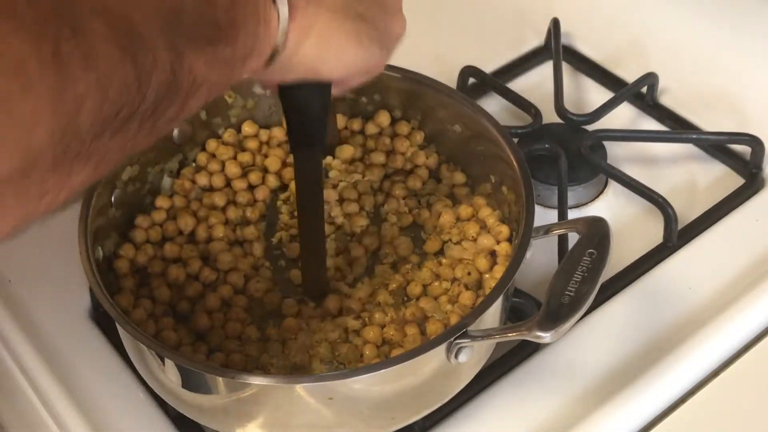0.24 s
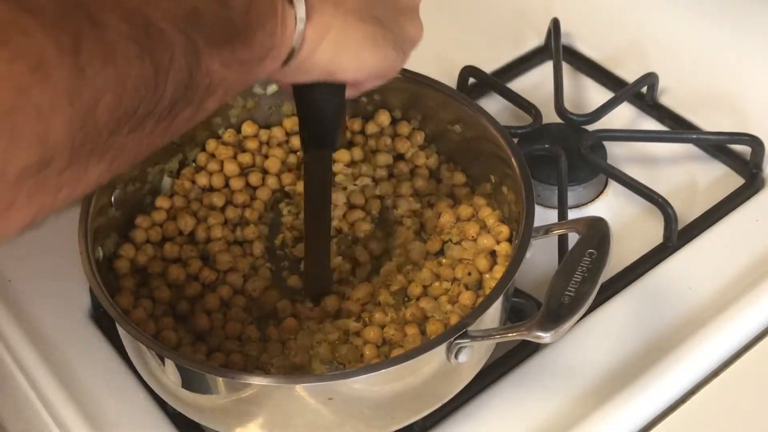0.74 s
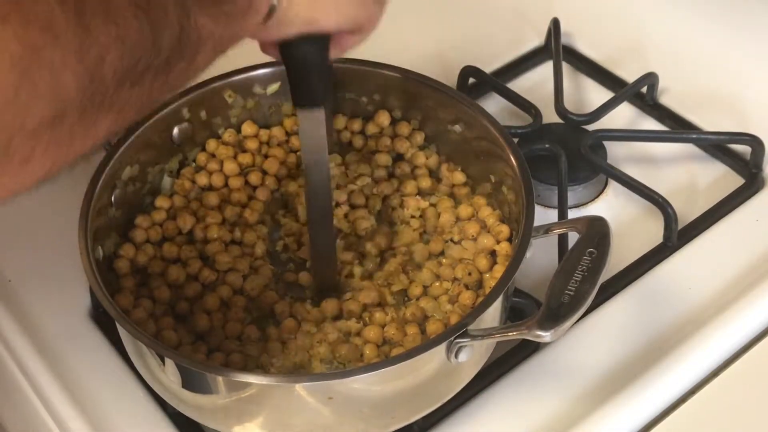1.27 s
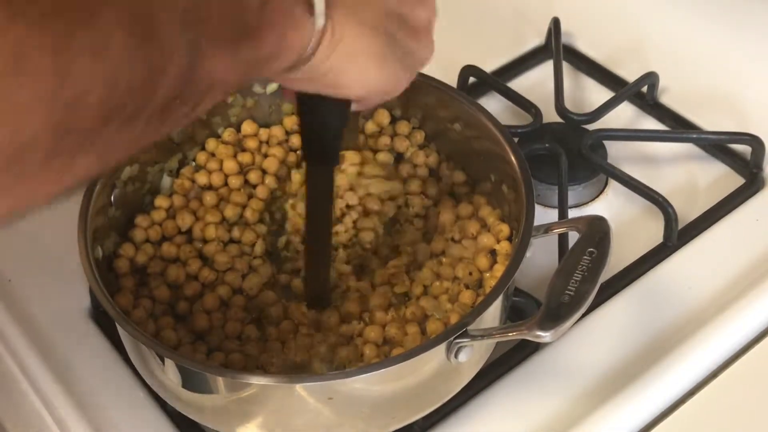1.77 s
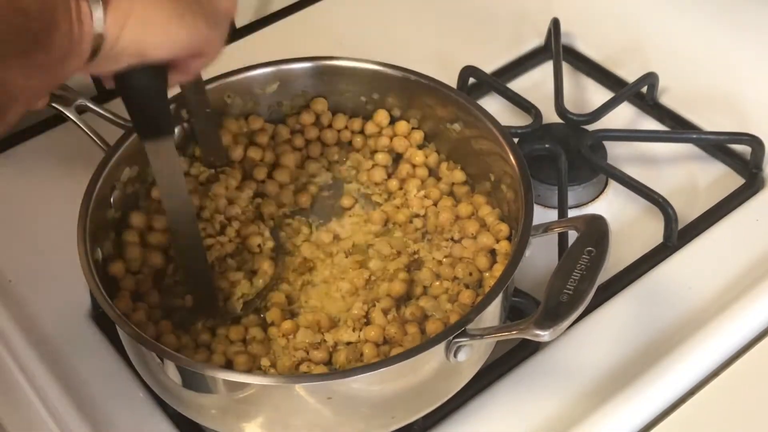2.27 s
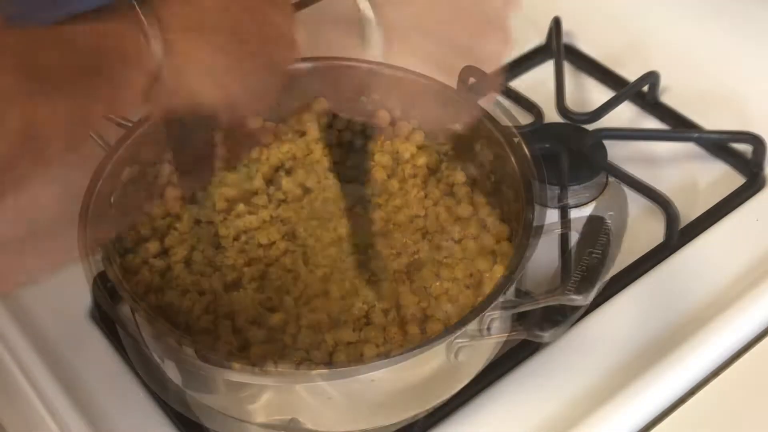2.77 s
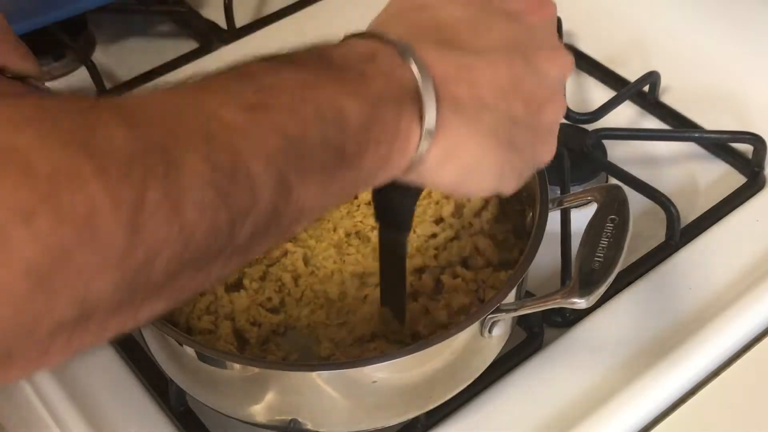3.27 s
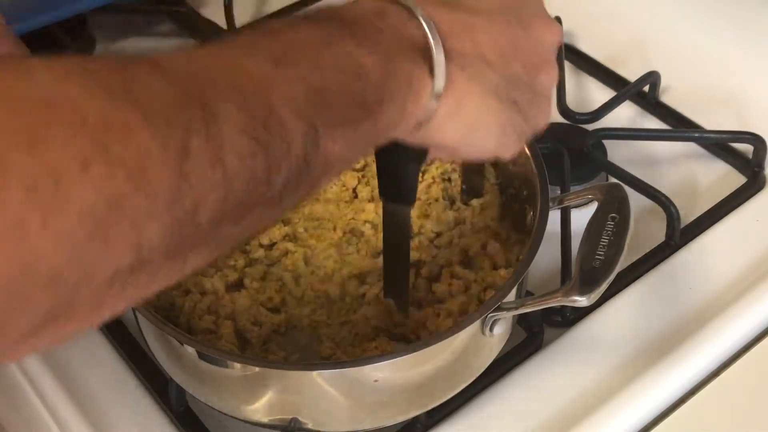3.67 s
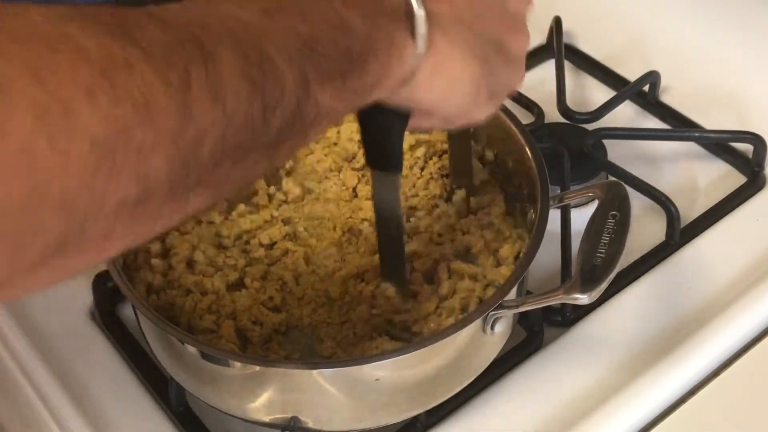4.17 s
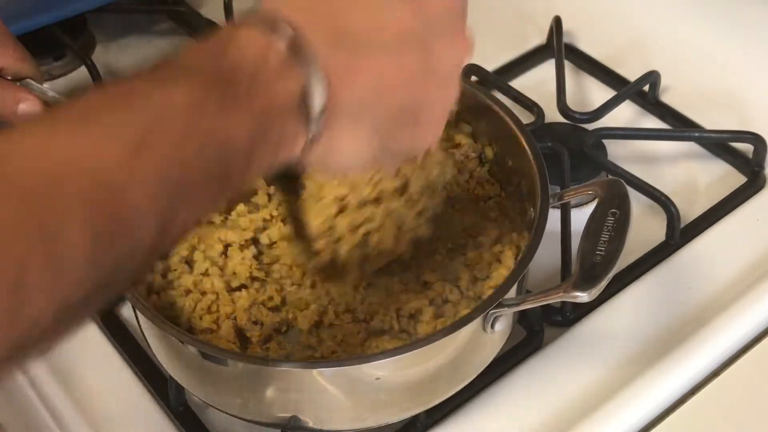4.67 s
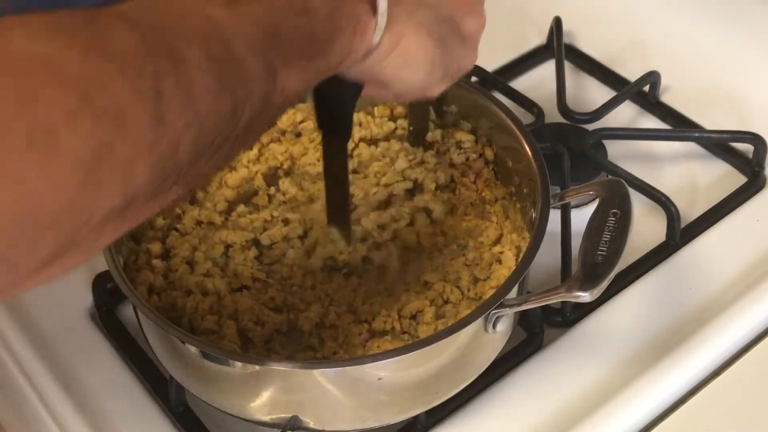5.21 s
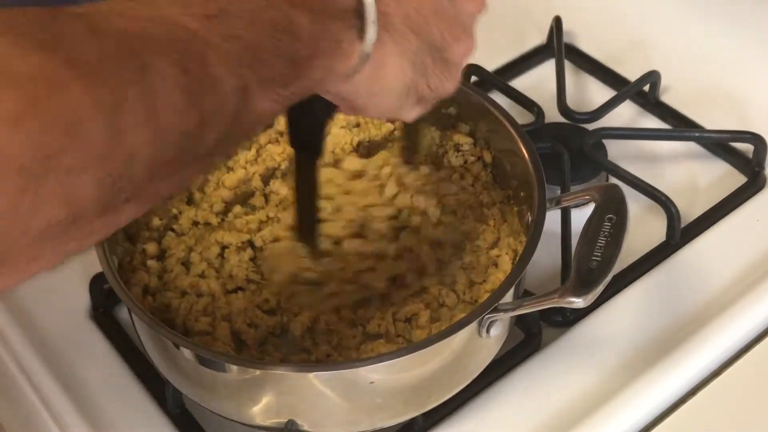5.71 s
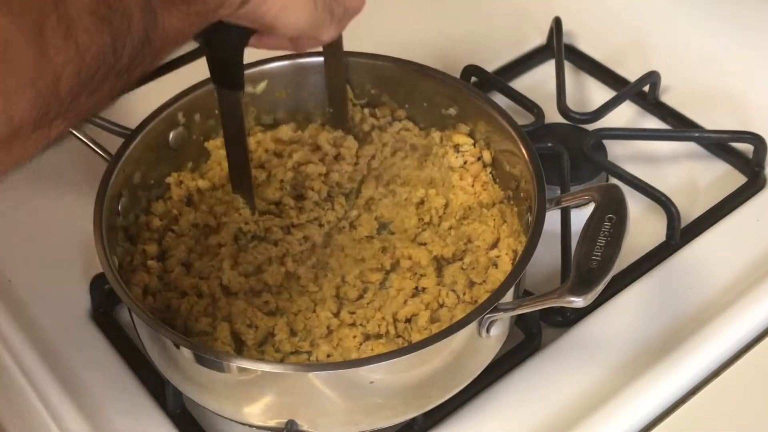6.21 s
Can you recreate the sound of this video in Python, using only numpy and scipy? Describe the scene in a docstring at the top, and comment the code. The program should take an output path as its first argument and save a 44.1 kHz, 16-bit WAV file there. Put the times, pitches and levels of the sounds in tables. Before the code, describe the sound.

A steel masher crushes cooked chickpeas in a metal pot on a stove, knocking the bottom with dull clanks between wet, crackling squelches.

```python
"""A steel masher crushes cooked chickpeas in a steel pot on a stove, in a small kitchen.
Strokes knock the pot's bottom: shaped noise bursts plus decaying modes, dulled by the food, with a room tail
and a dense rattle. Between knocks wet mash squelches (swelling noise, tiny pitched pops) and snaps brightly,
and the masher clicks and squeaks. A few pushes clunk the grate.
Beneath lie air noise, a hum, and a low rumble that rises near 2.8 s."""
import sys
import numpy as np
from scipy import signal
from scipy.fft import rfft, irfft, next_fast_len
from scipy.io import wavfile
from scipy.ndimage import uniform_filter1d, map_coordinates

SR = 44100
rng = np.random.default_rng(int(sys.argv[2]) if len(sys.argv) > 2 else 0)


def bounce(signal):
    """Save signal as a 16-bit WAV file at the path given by the first command-line argument."""
    frames = np.transpose(np.atleast_2d(signal))
    limited = np.clip(frames, -1, 1)
    pcm = np.round(limited * 32767).astype(np.int16)
    wavfile.write(sys.argv[1], SR, pcm)


N = 284424
TIME = np.arange(N) / SR
SIZE = 32768  # samples in one struck sound
HZ = np.fft.rfftfreq(SIZE, 1 / SR)
STRUCK_TIME = np.arange(SIZE) / SR


def amp(db):
    """Decibels to gain."""
    return 10 ** (np.asarray(db) / 20)


def unit(x):
    """Scale to rms 1."""
    return x / np.sqrt(np.mean(x ** 2) + 1e-20)


def along(points, hz):
    """Read a curve of (f/Hz, value) points on a log frequency axis."""
    f, value = np.transpose(points)
    return np.interp(np.log(hz + 1), np.log(f + 1), value)


def wobble(rate):
    """A smooth random curve, rate knots a second."""
    knots = rng.standard_normal(int(N * rate / SR) + 4)
    return map_coordinates(knots, [TIME * rate])


def filtered(x, response):
    """Apply a gain that depends on frequency."""
    m = next_fast_len(N + SR // 2)
    gain = response(np.fft.rfftfreq(m, 1 / SR))
    return irfft(rfft(x, m) * gain, m)[:N]


def coloured(x, spectrum):
    """Filter x by a (f/Hz, gain/dB) curve, then scale to rms 1."""
    return unit(filtered(x, lambda hz: amp(along(spectrum, hz))))


def add(track, s, sound):
    """Mix a sound into the track at time s."""
    part = track[max(round(s * SR), 0):][:len(sound)]
    part += sound[:len(part)]


def fading_ring(start_db=-49, t60=0.99):
    """The pot's bottom is still sounding as the scene opens: coloured noise that decays."""
    spectrum = [(300, -31), (500, -9.5), (610, -7), (740, -8), (830, -31), (950, -13),
                (1200, -21.5), (4000, -33.0)]
    ring = coloured(rng.standard_normal(N), spectrum)
    return amp(start_db - 60 * TIME / t60) * ring


# tone of the kitchen's air noise: f/Hz, relative level/dB
AIR_TONE = [(25, -38), (31, -17), (39, -2.5), (54, 11.5), (75, -1.5), (130, 5.5), (175, -2), (300, -12.5),
            (690, -9.5), (1100, -11), (1500, -12.5), (2400, -23.5), (6000, -33), (10500, -50), (12900, -31),
            (15500, -42)]
# low rumble over time, before its gain: t/s, level/dB
RUMBLE_LEVEL = [(0, -69), (2.72, -70), (2.93, -52.5), (6.45, -51)]
# appliance tones, about which each level wanders: f/Hz, level/dB (rms)
HUM_TONES = [(59.8, -61), (108, -76), (120, -65.5), (172, -87), (248, -70), (587, -74), (958, -87)]


def background(air_db=-56, rumble_gain_db=-3):
    """Steady air noise, a low rumble and the slightly unsteady hum of appliances."""
    air = amp(air_db) * coloured(rng.standard_normal(N), AIR_TONE)
    rumble_tone = [(25, -36), (55, -1.5), (150, -9), (270, -7.0), (500, -17.5), (1500, -44)]
    rumble = coloured(rng.standard_normal(N), rumble_tone)
    rumble_db = np.interp(TIME, *np.transpose(RUMBLE_LEVEL)) + rumble_gain_db
    hum = np.zeros(N)
    for hz, db in HUM_TONES:
        level = amp(db + wobble(3.24)) * np.sqrt(2)  # rms to peak
        hum += level * np.sin(2 * np.pi * hz * TIME + 0.31 * wobble(2.76))
    return air + amp(rumble_db) * rumble + hum


# how fast the kitchen's answer dies: f/Hz, t60/s
KITCHEN_DECAY = [(100, 0.52), (260, 0.4), (700, 0.4), (1800, 0.33), (5000, 0.29), (13000, 0.2)]


def room_tail(noise, build_s=0.0042):
    """The kitchen's answer, of energy 1: it builds up, then each frequency dies at its own speed."""
    hz, t, z = signal.stft(noise, SR, nperseg=256)
    decay = amp(-60 * t / along(KITCHEN_DECAY, hz)[:, None])
    tail = signal.istft(z * decay, SR, nperseg=256)[1][:SIZE]
    tail = tail * (1 - np.exp(-STRUCK_TIME / build_s))
    return tail / np.linalg.norm(tail)


def swells(rows, attack_s, release_s):
    """Envelope of (t/s, length/s, level/dB) events: attack before t, hold, release; powers add."""
    power = np.zeros(N)
    for s, length, db in rows:
        before = np.maximum(s - TIME, 0) / attack_s
        after = np.maximum(TIME - s - length, 0) / release_s
        power += amp(db) ** 2 * np.exp(-2 * np.minimum(before + after, 20))
    return np.sqrt(power)


def pops(rate, spread_db):
    """Tiny bursts at random times; a wider spread makes a few much larger than the rest."""
    size = amp(spread_db * np.minimum(rng.standard_exponential(N), 4))
    return (rng.random(N) < rate / SR) * size * rng.choice([-1, 1], N)


def grains(rate, length, pitch_hz, spread_db=4.5, cycles=6, octaves=.6, size=200):
    """Tiny air pockets pop, each a few cycles at its own pitch, a few much larger than the rest."""
    n, t = max(int(length * SR), 1), np.arange(size) / SR
    chance = rng.random((int(abs(rate) * length) + 3, 4))
    start = (chance[:, :1] * n).astype(int)
    detune = 2 * octaves * (chance[:, 1:2] - chance[:, 2:3])  # octaves
    hz = np.minimum(pitch_hz * 2 ** detune, SR / 2)
    strength = amp(-spread_db * np.log(.01 + chance[:, 3:]))
    waves = strength * np.sin(2 * np.pi * hz * t) * amp(-60 * hz * t / cycles)
    places = start + np.arange(size)
    return unit(np.bincount(places.ravel(), waves.ravel(), n + size))


# tone of the smearing paste and of the rattle after knocks: f/Hz, relative level/dB
SMEAR_TONE = [(300, -34), (700, 12.5), (1300, 4), (2500, -4.5), (5000, -7), (8000, -17.5), (16000, -21)]
# tone of bursting air pockets: f/Hz, relative level/dB
CRACKLE_TONE = [(1000, -22), (3500, -9), (6000, 2.5), (9000, 2.5), (13000, 3.5), (16000, -2)]
# each push or pull of the plate, before layer gains:
# t/s, length/s, wet crackle level/dB, paste smear level/dB (relative to the crackle)
SQUELCH_EVENTS = [(0.039, 0.089, -55.5, -20), (0.249, .19, -58.5, -3), (0.5, 0.19, -61, -7),
                  (0.801, 0.1, -56.5, -7), (1.015, 0.092, -58.5, -8), (1.198, 0.09, -56.5, -7.5),
                  (1.41, 0.048, -54, -3), (1.537, 0.07, -55, -10), (2.132, 0.046, -62, -10),
                  (2.22, 0.31, -60.5, -6), (2.591, 0.05, -52, -5.5), (2.694, 0.42, -65, 1),
                  (3.172, .13, -60, -6.5), (3.387, .12, -59.5, -8), (3.563, 0.065, -59.5, -8.5),
                  (3.736, 0.063, -58, -7), (3.887, 0.23, -63.5, -1), (4.148, 0.18, -70, 1),
                  (4.634, 0.072, -77, -14), (4.9, .22, -65.5, 0.5), (5.186, 0.23, -62, -0.5),
                  (5.496, .22, -63.5, -5), (6.024, 0.5, -61.5, -1)]
# steel rubs the wall: t/s, length/s, level/dB
SQUEAK_EVENTS = [(2.26, 0.013, -43.5), (2.299, 0.011, -54), (5.28, .022, -56)]
SWELL_S, RELEASE_S = 0.012, 0.023  # squelch build-up and dying away (time constants)
REST_DB = -76  # the mash settles between strokes; before the crackle gain
RATTLE_DB, RATTLE_T60_S = -16.5, 0.42  # rattle: level against the knock's table level, decay
SQUEAK_EDGE_S = 0.0044  # how fast a squeak starts and stops (time constant)


def mash_and_rattle(smear_gain_db=-1, crackle_gain_db=-6.0, clump_db=3.5, tick_db=1, pop_hz=7800,
                    tear_db=-2, tear_hz=3600, room_db=-7):
    """Paste smears and air pockets burst in clumps; a dense, irregular rattle trails knocks; steel squeaks."""
    wet_rows = [(s, length, db) for s, length, db, _ in SQUELCH_EVENTS]
    pressed_rows = [(s, length, db + smear_db) for s, length, db, smear_db in SQUELCH_EVENTS]
    rattle_rows = [(s + SWELL_S * 2, 0, db + RATTLE_DB) for s, db, *_ in KNOCK_EVENTS]
    wet = swells(wet_rows, SWELL_S, RELEASE_S) + amp(REST_DB)
    pressed = swells(pressed_rows, SWELL_S, RELEASE_S)
    rattle = swells(rattle_rows, SWELL_S / 2, RATTLE_T60_S / np.log(1000))

    # smear and rattle share one irregular stream of bursts
    stream_level = np.hypot(amp(smear_gain_db) * pressed, rattle) * amp(0.87 * wobble(36))
    smear_and_rattle = stream_level * coloured(pops(rate=4400, spread_db=0), SMEAR_TONE)
    tearing = amp(tear_db) * pressed * grains(1100, N / SR, tear_hz)[:N]
    fizz = amp(clump_db * wobble(70)) * coloured(pops(rate=2800, spread_db=2.0), CRACKLE_TONE)
    ticks = amp(tick_db) * grains(380, N / SR, pop_hz, spread_db=5, cycles=8)[:N]
    crackle = amp(crackle_gain_db) * wet * (fizz + ticks)
    rub_tone = [(1200, -25), (1900, -9), (3500, 0), (4400, -7), (6000, -21)]
    rub = coloured(pops(rate=4500, spread_db=1), rub_tone)
    squeak = swells(SQUEAK_EVENTS, SQUEAK_EDGE_S, SQUEAK_EDGE_S) * rub

    dry = smear_and_rattle + tearing + crackle + squeak
    room = signal.fftconvolve(dry, room_tail(rng.standard_normal(SIZE)))[:N]
    return dry + amp(room_db) * room


def shaped(burst, gain, size=400):
    """Give a noisy burst a broad spectrum, causally: peaks ring on after the attack."""
    z = rfft(burst, SIZE)
    broad = np.sqrt(np.abs(uniform_filter1d(np.abs(z) ** 2, size)))
    # folding the cepstrum makes the filter minimum-phase
    cepstrum = irfft(np.log(np.maximum(gain / broad, 1e-6)))
    cepstrum[1:SIZE // 2] *= 2
    cepstrum[SIZE // 2 + 1:] = 0
    return irfft(z * np.exp(rfft(cepstrum)))


def strike(noise, t60, rise_s, room_db):
    """Dense, quickly damped vibration of a struck body, followed by the room."""
    direct = noise[0] * amp(-60 * STRUCK_TIME / t60) * (1 - np.exp(-STRUCK_TIME / rise_s))
    return direct / np.linalg.norm(direct) + amp(room_db) * room_tail(noise[1])


def damped(hz, t60, rise_s=0.0023):
    """One ringing mode, at a random phase."""
    wave = np.sin(2 * np.pi * (hz * STRUCK_TIME + rng.random()))
    return wave * amp(-60 * STRUCK_TIME / t60) * (1 - np.exp(-STRUCK_TIME / rise_s))


# a blow on bare steel: f/Hz, relative level/dB
BARE_BLOW_TONE = [(30, -30), (110, 0), (185, -0.5), (270, -7), (370, -2), (600, -3), (830, -4), (950, 3.5),
                  (1300, -1.15), (2100, -5), (3900, -8), (4600, -9.5), (5450, -11), (6100, -11),
                  (8500, -15), (9600, -21), (12500, -21), (15500, -28)]
# where the bottom booms and zings: f/Hz, share of the blow's boom (0-1)
BOOM_SHARES = [(370, 0.09), (600, 1), (830, 0.7), (950, 0), (4600, 0.25), (5450, 0.84), (6100, 0.03)]
# the thud below this pitch grows less than the blow (dB per dB)
THUD_HZ, THUD_FOLLOWS, USUAL_BLOW_DB = 420, 0.87, -37.5


def blow_colour(hz, db, boom_db, cutoff, slope):
    """Spectrum of a blow in dB: central blows boom, food dulls the treble, light blows are mostly thud."""
    thud = (THUD_FOLLOWS - 1) * (db - USUAL_BLOW_DB) / (1 + (hz / THUD_HZ) ** 4)
    dulling = slope * np.log2(np.maximum(hz / cutoff, 1))
    return along(BARE_BLOW_TONE, hz) + thud + boom_db * along(BOOM_SHARES, hz) - dulling


# modes of the loaded pot: f/Hz, level/dB (against the whole dense response), t60/s
POT_MODES = [(168.8, -24.5, 0.31), (370, -26.5, 0.42), (501.5, -27.5, 0.26), (594, -26.5, 0.38),
             (623.2, -22.5, 0.14), (773.7, -19, 0.14), (943.5, -27, 0.32), (1048, -29, 0.29),
             (1105, -26.5, 0.25), (1216, -21.5, 0.2), (1466, -31, 0.44), (1580, -45, 0.16),
             (1986, -24, 0.1), (2176, -29, 0.25), (2896, -23.5, 0.16), (3600, -55, 0.37),
             (4640, -21, 0.071), (5420, -30, 0.17), (5270, -38, 0.31), (8530, -21, 0.21)]


def pot_ring(colour):
    """Each mode rings as strongly as the blow drives its frequency."""
    ring = np.zeros(SIZE)
    for hz, db, t60 in POT_MODES:
        mode = damped(hz, t60)
        drive_db = np.interp(hz, HZ, colour)
        ring += amp(db + drive_db) * mode / np.linalg.norm(mode)
    return ring


# masher on pot: t/s, level/dB (before the knock gain), boom of the pot's bottom/dB,
# then the cushion of food: cut-off f/Hz, treble lost above it/dB per octave
KNOCK_EVENTS = [(0.367, -42, 1.5, 1070, 4), (0.5746, -36.5, 11, 1100, 0.6), (0.8902, -41.5, 0, 1090, 3.5),
                (1.0162, -35.5, 11, 1100, 0), (1.303, -40, -0.5, 1000, 2.5), (1.407, -31.5, 9, 1100, -0.4),
                (1.6258, -38, 1, 1000, 2), (1.7148, -28.5, 8.5, 1100, 0), (1.9319, -32.5, 4.5, 2000, 5.5),
                (2.0764, -47, 0, 2310, 11.5), (2.138, -41.5, 5, 1030, 10.5), (2.396, -35, 3.5, 1200, 5.5),
                (2.439, -36.5, 1.5, 1710, 5.5), (2.677, -43, -0.5, 1410, 4.5), (2.769, -42, -4, 1000, 6.5),
                (2.83, -26.5, 1, 1600, 1.5), (3.2917, -54, 8, 2000, 3.5), (3.796, -55.5, 3.5, 1000, 11),
                (3.889, -35.5, 6, 1210, 4.5), (4.154, -59.5, -11, 1000, 5), (4.3145, -48, -3.5, 990, 10),
                (4.4679, -42.5, 3, 1500, 6.5), (4.8056, -30, -1, 1400, 3), (4.864, -37, 3.5, 2980, 16),
                (5.172, -53.5, 7.5, 1000, 15), (5.3051, -35, 7, 1410, 8.5), (5.4585, -56, 4, 1000, 9),
                (5.689, -45, 3.5, 2240, 22), (6.086, -43, 3.5, 2330, 20)]


def knocks(gain_db=45, crack_db=1, alike=0.27):
    """Central blows drive the pot's bottom; blows cushioned by food lose their clang and edge."""
    out = np.zeros(N)
    same_pot = rng.standard_normal((2, SIZE))
    low = 1 / np.sqrt(1 + (HZ / 1050) ** 6)  # crossover from boom to crack
    for s, db, boom_db, cutoff, slope in KNOCK_EVENTS:
        # every blow shares part of its fine pattern with the others
        noise = np.sqrt(alike) * same_pot + np.sqrt(1 - alike) * rng.standard_normal((2, SIZE))
        # the heavy bottom rings on; the treble cracks and is gone, the sooner the lighter the blow
        life = np.interp(db, [-42, -30], [.018, .036])  # t60 in s
        boom = strike(noise, t60=2.1 * life, rise_s=.0003, room_db=-.5)
        crack = amp(crack_db) * strike(noise, t60=life, rise_s=0.00043, room_db=-5.5)
        burst = irfft(rfft(boom) * low + rfft(crack) * (1 - low))
        colour = blow_colour(HZ, db, boom_db, cutoff, slope)
        add(out, s, amp(db + gain_db) * (shaped(burst, amp(colour)) + pot_ring(colour)))
    return out


def resonances(modes):
    """Gain of resonant peaks that stand on a flat response."""
    power = 1
    for hz, width, db in modes:
        power = power + amp(db) ** 2 / (1 + (2 * (HZ - hz) / width) ** 2)
    return np.sqrt(power)


# resonances of the masher: f/Hz, width/Hz, level/dB (over a flat response, then normalised)
MASHER_PEAKS = [(1140, 130, 37.5), (1370, 92, 9), (2990, 240, 23), (4450, 410, 18), (6200, 560, 15.5),
                (9000, 450, 7), (12200, 1100, 3.5)]
# lingering modes of its frame: f/Hz, level/dB (relative to the event's ring), t60/s
FRAME_MODES = [(1134, 3.5, 0.23), (1276, -3, 0.14), (1445, -4, 0.22), (3080, -8, 0.17)]
# sharp clicks of the masher, and a few bright wet snaps of the mash (at 0.375 and 1.2435 s):
# t/s, level/dB (before gain), then relative to it: body/dB, ping/dB, top/dB
CLICK_AND_SNAP_EVENTS = [(0.375, -42, -7, 13, 20), (1.068, -34, -20, 14.5, -4), (1.2435, -27.5, -28, 0, -7),
                         (3.29, -37, -9.5, -10, -14), (5.0324, -23, -10.5, 9.5, -2),
                         (6.054, -34, -30, 8, -19), (6.229, -18, -9, 2, 4)]


def clicks_and_snaps(gain_db=21, ring_db=-14):
    """Masher clicks and bright wet snaps: a very short shaped burst, then faint modes set by its body."""
    out, masher = np.zeros(N), unit(resonances(MASHER_PEAKS))
    for s, db, body, ping, top in CLICK_AND_SNAP_EVENTS:
        burst = strike(rng.standard_normal((2, SIZE)), t60=0.014, rise_s=.0001, room_db=-8.5)
        colour = [(200, body - 16), (1200, body + 2), (3000, body + 3), (6000, 1.5),
                  (9500, ping), (14000, top)]
        add(out, s, amp(db + gain_db) * shaped(burst, masher * amp(along(colour, HZ))))
        for hz, level, t60 in FRAME_MODES:
            add(out, s, amp(db + body + ring_db + level) * damped(hz, t60))
    return out


# off-centre pushes rock the pot against the stove's grate: t/s, level/dB
ROCK_EVENTS = [(2.831, -38), (3.891, -69), (5.307, -29.5)]
# modes of the grate: f/Hz, level/dB (relative to the push), t60/s
GRATE_MODES = [(157, -2.5, 0.24), (365.5, 5.5, 0.137), (394, 1.5, 0.25), (566, -5.5, 0.42)]


def grate():
    """The iron grate answers a rocking pot with a low clunk of damped modes."""
    out = np.zeros(N)
    for s, db in ROCK_EVENTS:
        for hz, level, t60 in GRATE_MODES:
            add(out, s, amp(db + level) * damped(hz, t60, rise_s=0.0044))
    return out


def scene():
    """Pot, grate, masher and mash in the kitchen."""
    struck = knocks() + grate() + clicks_and_snaps()
    return (struck + mash_and_rattle() + fading_ring() + background())[None]


def record(dry, top_hz=15800):
    """The microphone keeps nothing above its band limit."""
    return filtered(dry[0], lambda hz: hz < top_hz)[None]


dry = scene()
out = record(dry)
bounce(out)
```